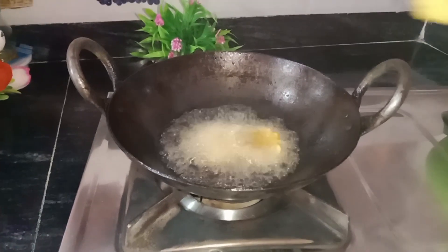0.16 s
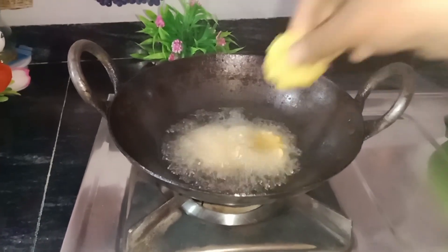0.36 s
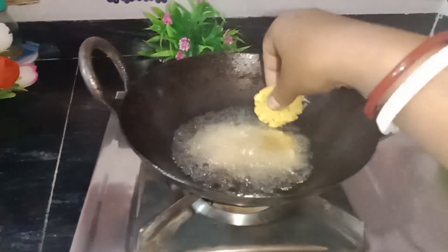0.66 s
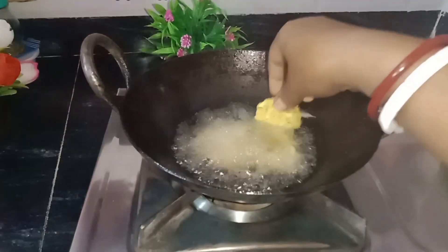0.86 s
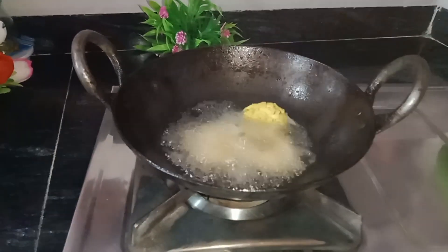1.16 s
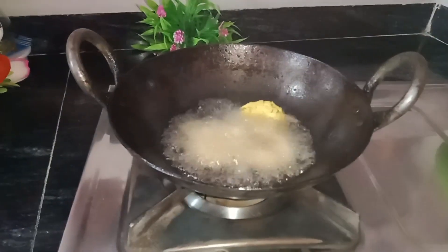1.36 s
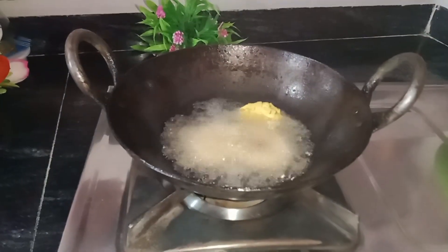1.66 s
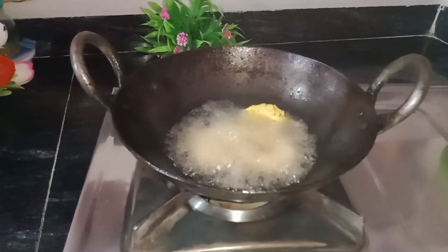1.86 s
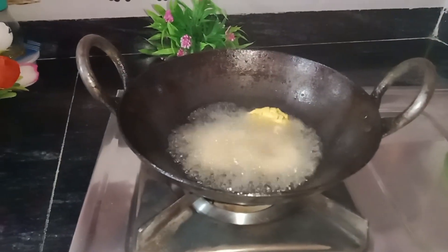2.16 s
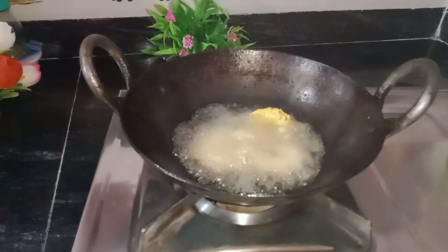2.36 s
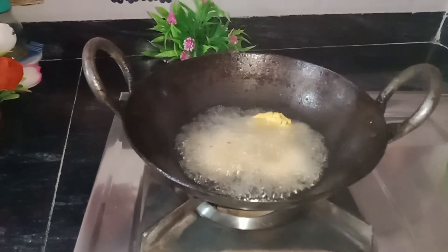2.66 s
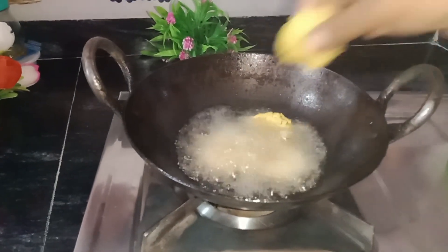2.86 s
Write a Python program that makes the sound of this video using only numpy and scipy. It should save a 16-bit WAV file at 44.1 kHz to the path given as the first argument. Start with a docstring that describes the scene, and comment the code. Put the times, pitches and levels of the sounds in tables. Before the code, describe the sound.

Deep-frying sizzle in a metal wok, crackling and swelling slightly as another patty goes in.

```python
"""Patties deep-frying in a steel wok

A small kitchen, one microphone close to the oil. Thousands of tiny steam bubbles burst each second,
larger ones gurgle below and water drops spit. At about 0.7 s another patty slips in and the sizzle
swells. The bowl of the wok and the hard walls colour the frying, over a faint mains hum."""
import sys
import numpy as np
from scipy import signal
from scipy.fft import rfft, irfft
from scipy.io import wavfile

SR = 44100
rng = np.random.default_rng(int(sys.argv[2]) if len(sys.argv) > 2 else 0)


def generate_wav(signal):
    """Clip the signal to [-1, 1] and save it as 16-bit WAV at the path in sys.argv[1]."""
    frames = np.transpose(np.atleast_2d(signal))
    scaled = np.clip(frames, -1, 1) * 32767
    pcm = np.round(scaled).astype(np.int16)
    wavfile.write(sys.argv[1], SR, pcm)


N = 132300

# Vigour of the fine fizz, crackle and spits: (time [s], level [dB])
FIZZ_VIGOUR = [(0, -35.5), (.08, -37.5), (.14, -34), (.37, -36.5), (.5, -35.5), (.73, -32.5), (1.15, -32.5),
               (1.35, -34), (1.55, -33), (1.72, -35.5), (1.88, -34), (2.25, -37.5), (2.5, -36), (3.0, -36)]
# Vigour of the middle-sized bubbles: (time [s], level [dB])
BOIL_VIGOUR = [(0, -36), (.18, -36), (.27, -35.5), (.55, -37.5), (.8, -36.5), (.95, -32.5), (1.1, -34.5),
               (1.22, -33), (1.33, -34.5), (1.7, -34.5), (2.1, -33.5), (2.55, -35.5), (2.66, -34),
               (2.8, -36), (3.0, -34)]
def sizzle():
    """Fine fizz, middle-sized bubbles, dry crackle and small spits from all over the oil."""
    fizz = bubbles(5200, 15370, per_s=20000, spread_db=4, q=13.5, clump_db=1, patchy_db=-1, sizes=14)
    boil = bubbles(776, 4550, per_s=4500, spread_db=2, q=6.7, clump_db=.75, patchy_db=1.1, sizes=22)
    crackle = rms_one(sum(kitchen(bursts(per_s=225, spread_db=3.5)) for _ in range(4)))
    fine = from_db(3.5) * fizz + from_db(-4) * crackle + from_db(-11.5) * spits()
    return level(FIZZ_VIGOUR) * fine + from_db(.11) * level(BOIL_VIGOUR) * boil


def bubbles(low_hz, high_hz, per_s, spread_db, q, clump_db, patchy_db, sizes):
    """Bubbles burst in clumps and ring briefly; each size has its own pitch, spot and ebb and flow."""
    clumps = from_db(clump_db * (drift(9) + drift(35)))
    out = 0
    for hz in np.geomspace(low_hz, high_hz, sizes):
        clicks = bursts(per_s / sizes, spread_db) * from_db(patchy_db * drift(7))
        out += np.sqrt(hz) * rms_one(kitchen(resonate(clicks, hz, hz / q)))
    return rms_one(out * clumps)


def spits(per_s=300, pitches=11, q=2.2):
    """Small spits stand out of the sizzle, each ringing for a few cycles."""
    out = 0
    for hz in np.geomspace(2600, 14000, pitches):
        clicks = bursts(per_s / pitches, spread_db=1.5)
        out += np.sqrt(hz) * rms_one(resonate(clicks, hz, hz / q))
    return rms_one(kitchen(out))


# Water drops in the oil: (time [s], ring level [dB], pitch [Hz], crack against ring [dB], snap [dB])
WATER_DROPS = [(.194, -14, 4300, -12, -24), (.4437, -22.5, 3400, 7, -24), (.586, -22, 3200, 0, -20),
               (0.6076, -15.5, 5400, 7, -24), (0.606, -21.5, 1200, 0, -30), (0.6074, -9, 3310, -16, -26),
               (0.7494, -16, 4540, 15, -17), (.7636, -16, 3800, 0, -22), (.859, -13, 8300, 2, -12),
               (0.8732, -27, 3020, 13, -12), (0.9303, -22, 3270, 1, -5), (.9605, -21, 2950, 7, -14),
               (0.9603, -11.5, 7400, 5, -5), (0.9712, -19, 7900, -10, -18), (1.0478, -15.5, 7360, 1, -13),
               (1.1307, -11, 6000, -12, -23), (1.222, -21.5, 3170, 19, -27), (1.56, -16.5, 8400, 18, -13),
               (1.5808, -13.5, 7000, 14, -10), (1.6252, -22, 3200, -12, -26),
               (1.7012, -15.5, 3330, -14, -23), (2.3822, -17, 3350, 6, -9), (2.4805, -25, 1500, 13, -21),
               (2.648, -16.5, 4080, -5, -18), (2.682, -23, 3400, 9, -9), (2.8365, -18.5, 7300, -3, -21),
               (2.954, -15.5, 8500, 1, -13)]
# Ticks of fine spatter: (time [s], level [dB])
SPATTER = [(0.092, -13), (.187, -18), (.2515, -18), (0.318, -17), (.673, -16), (.7336, -11), (1.119, -9),
           (2.2195, -10), (2.4154, -8.5)]
POP_RISE_S = .00008  # build-up of the ring and the snap
def pops(ring_t60_cycles=16.7, spray_db=-16, spray_t60_s=.06):
    """Each drop gives a crack, a snap of steam, a short ring and a grainy spray; the finest only snap."""
    out = np.zeros(N)
    t = np.arange(SR // 4) / SR
    rise = 1 - np.exp(-t / POP_RISE_S)
    for start, db, hz, crack_db, snap_db in WATER_DROPS:
        decay = from_db(-60 * t * hz / ring_t60_cycles)
        pop = np.gradient(np.sin(2 * np.pi * hz * t) * decay * rise)
        pop /= np.abs(pop).max()
        pop[0] += from_db(crack_db)
        spray = rms_one(rng.standard_normal(len(t)) * rng.random(len(t)))
        pop += spray * from_db(spray_db - 60 * t / spray_t60_s)
        add(out, start, kitchen(from_db(db) * pop + snap(snap_db)))
    for start, db in SPATTER:
        add(out, start, kitchen(snap(db)))
    return out


def snap(db, above_hz=8140, t60_s=.0082):
    """A bright, very short hiss of escaping steam."""
    t = np.arange(SR // 4) / SR
    envelope = (1 - np.exp(-t / POP_RISE_S)) * from_db(db - 60 * t / t60_s)
    return butter(rng.choice([-1, 1], len(t)) * envelope, 2, above_hz, "high")


# Runs of sputtering: (time [s], level [dB])
SPUTTER_RUNS = [(0, -44), (.13, -36.5), (.39, -45), (.66, -40.5), (.93, -40.5), (1.3, -47), (1.69, -37.5),
                (1.79, -46), (2.5, -51), (2.66, -36.5), (2.8, -48)]
# Resonances of the pan: (frequency [Hz], width [Hz])
PAN_MODES = [(2930, 150), (3270, 300), (3650, 100), (4250, 430)]
def sputter():
    """Runs of small bursts keep the pan ringing around 3 to 4 kHz."""
    ring = sum(resonate(kitchen(bursts(500, spread_db=1.5)), hz, width) for hz, width in PAN_MODES)
    return level(SPUTTER_RUNS) * rms_one(ring)


# Colour of the sizzle as it leaves the wok: (frequency [Hz], gain [dB])
WOK_COLOUR = [(40, -47), (190, -53), (280, -31), (440, -15), (600, -6), (740, -0.5), (900, -9),
              (1300, -0.5), (2200, 0), (2540, -1.5), (2850, 1), (3700, -1), (5400, 0.5), (6000, -2.5),
              (6900, 1), (8300, 0.5)]
# Air resonances of the bowl: (frequency [Hz], width [Hz], gain [dB])
BOWL_MODES = [(756, 97, 0.5), (1310, 22, -5), (1440, 18, -8), (1544, 17, -2.5), (2035, 18, -4.5),
              (2315, 52, -10.5), (3213, 95, -8.5)]
def wok(oil):
    """The bowl colours the sound of the oil and adds its air resonances."""
    coloured = tint(oil, WOK_COLOUR)
    return coloured + sum(from_db(db) * resonate(coloured, hz, width) for hz, width, db in BOWL_MODES)


# Swells of the bowl's hollow ring: (time [s], level [dB])
HOLLOW_SWELLS = [(0, -40.5), (.24, -44), (.3, -36.5), (.41, -39.5), (.55, -36.5), (.7, -42), (1.04, -40),
                 (1.09, -34.5), (1.16, -43.5), (1.72, -41), (2.0, -44), (2.57, -43.5), (2.62, -38),
                 (2.87, -43.5), (2.95, -40)]
# The bowl's strongest air resonances: (frequency [Hz], width [Hz], gain [dB])
HOLLOW_AIR_MODES = [(1004, 9, 14), (1072, 67, 13), (1088.5, 4.6, 10), (1116.3, 7.7, 11.5)]
def hollow_ring():
    """Bursts keep the air in the bowl ringing near 1 kHz."""
    clicks = bursts(1500, spread_db=2.5)
    ring = sum(from_db(db) * resonate(clicks, hz, width) for hz, width, db in HOLLOW_AIR_MODES)
    return from_db(-.5) * level(HOLLOW_SWELLS) * rms_one(ring)


# Surges of glugging: (time [s], level [dB])
GLUG_SURGES = [(0, -48), (.2, -49.5), (.25, -57), (.35, -43), (.47, -53), (.68, -52), (.78, -46.5),
               (1.03, -56), (1.2, -46), (1.52, -49.5), (1.62, -62), (1.69, -45), (1.79, -63), (1.92, -63),
               (2.0, -52.5), (2.16, -46), (2.3, -54), (2.7, -51.5), (2.81, -61.5), (2.95, -45.5)]
def glugs():
    """Larger bubbles glug lightly in slow surges, pitched above the gulps."""
    glug = bubbles(544.7, 607.6, per_s=1200, spread_db=1, q=13.2, clump_db=1, patchy_db=1, sizes=2)
    return level(GLUG_SURGES) * rms_one(butter(glug, 3, 440, "high"))


# Low gulps of steam: (middle time [s], length [s], level [dB], pitch [Hz])
STEAM_GULPS = [(0.059, .16, -48, 360), (0.243, 0.12, -54, 343), (0.366, 0.14, -56.5, 346),
               (0.753, 0.075, -56.5, 354), (1.224, .12, -52.5, 340), (1.45, .18, -54, 354),
               (1.614, 0.28, -58, 368), (1.99, .19, -55.5, 356), (2.141, 0.17, -56.5, 337),
               (2.343, .08, -58, 348), (2.671, 0.086, -56.5, 345), (2.792, 0.1, -63, 255)]
def gulps(pitch_spread=1.189):
    """Pockets of steam well up, each a swelling and fading cluster of large bubbles around one pitch."""
    out = np.zeros(N)
    for middle, length, db, hz in STEAM_GULPS:
        swell = np.sqrt(np.hanning(int(length * SR)))
        bubbling = butter(bursts(800, spread_db=1), 4, [hz / pitch_spread, hz * pitch_spread], "band")
        cluster = rms_one(bubbling[-len(swell):] * swell)
        add(out, middle - length / 2, from_db(db) * cluster * np.sqrt(np.mean(swell ** 2)))
    return out


def kitchen(x, tail_db=-8.5, t60_s=.1):
    """Direct sound, then a weaker tail off the hard walls, different for every spot in the wok."""
    t = np.arange(SR // 4) / SR
    tail = rng.standard_normal(len(t)) * from_db(-60 * t / t60_s) * (t > .002)
    return x + from_db(tail_db) * signal.fftconvolve(x, tail / np.linalg.norm(tail))[:len(x)]


def room_tone(mains_hum_hz=100):
    """A wavering mains hum and a faint rumble, far below the frying."""
    phase = 2 * np.pi * mains_hum_hz * np.arange(N) / SR + .22 * drift(4)
    hum = np.sin(phase) * from_db(3.8 * drift(3.67))
    rumble = butter(rng.standard_normal(N), 2, [35, 150], "band")
    return from_db(-84.5) * rms_one(hum) + from_db(-86) * rms_one(rumble)


def bursts(per_s, spread_db):
    """Random clicks, many small and a few large."""
    sizes = from_db(spread_db * np.minimum(rng.exponential(1, N), 5.5))
    return sizes * rng.choice([-1, 1], N) * (rng.random(N) < per_s / SR) + 1e-18


def drift(hz):
    """A random wander with unit rms."""
    knots = rng.standard_normal(2000)
    return rms_one(np.interp(np.arange(N) / SR * hz * 2, np.arange(len(knots)), knots))


def resonate(x, hz, width_hz):
    """A resonance with gain 1 at its peak."""
    r = np.exp(-np.pi * width_hz / SR)
    feedback = [1, -2 * r * np.cos(2 * np.pi * hz / SR), r * r]
    return signal.lfilter(np.array([1, 0, -1]) * (1 - r * r) / 2, feedback, x)


def tint(x, points, size=4096):
    """Causal (minimum-phase) filter through (frequency [Hz], gain [dB]) points."""
    hz, db = np.transpose(points)
    grid_hz = np.maximum(np.fft.rfftfreq(size, 1 / SR), 1)
    gain = from_db(np.interp(np.log(grid_hz), np.log(hz), db))
    cepstrum = irfft(np.log(gain))
    cepstrum[1:size // 2] *= 2
    cepstrum[size // 2 + 1:] = 0
    return signal.fftconvolve(x, irfft(np.exp(rfft(cepstrum))))[:N]


def butter(x, order, hz, kind):
    """A filter with a flat passband."""
    return signal.sosfilt(signal.butter(order, hz, kind, fs=SR, output="sos"), x)


def from_db(db):
    """Decibels to gain."""
    return 10 ** (np.asarray(db) / 20)


def rms_one(x):
    """Scale to unit rms."""
    return x / np.sqrt(np.mean(x ** 2) + 1e-20)


def level(rows):
    """A (time [s], level [dB]) curve as a gain per sample."""
    return from_db(np.interp(np.arange(N) / SR, *np.transpose(rows)))


def add(out, start_s, sound):
    """Mix a sound in from start_s on."""
    i = int(start_s * SR)
    part = sound[max(-i, 0):N - i]
    out[max(i, 0):max(i, 0) + len(part)] += part


def scene():
    """At the stove: the oil sounds through the wok, over low gurgling and the room tone."""
    oil = sizzle() + pops() + sputter()
    return (wok(oil) + hollow_ring() + glugs() + gulps() + room_tone())[None]


# Treble response of the microphone: (frequency [Hz], gain [dB])
MIC_RESPONSE = [(8450, 0), (8850, -5), (9300, -17.5), (9800, -13.5), (11300, -18.5), (13000, -17.5),
                (13800, -23.5), (15400, -18.5)]
def record(dry, cutoff_hz=15480):
    """One microphone with a dull top, then a steep treble cut."""
    steep_cut = signal.ellip(10, .3, 70, cutoff_hz, fs=SR, output="sos")
    return signal.sosfilt(steep_cut, tint(dry[0], MIC_RESPONSE))[None]


dry = scene()
out = record(dry)
generate_wav(out)
```